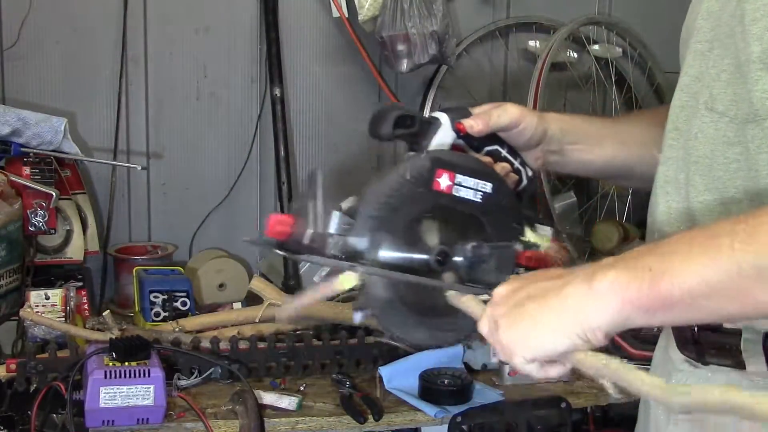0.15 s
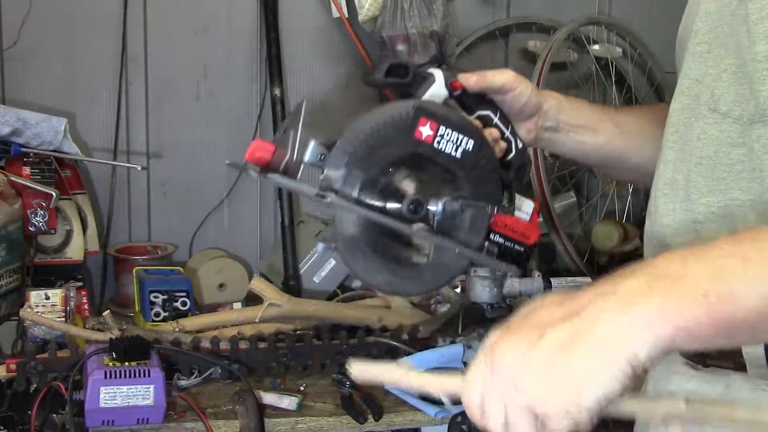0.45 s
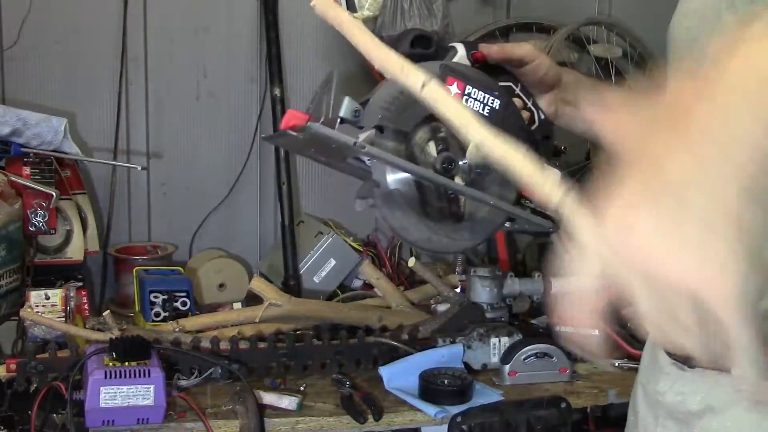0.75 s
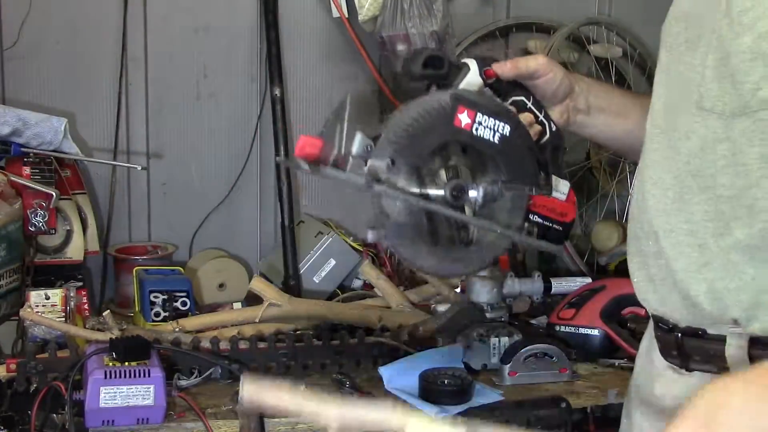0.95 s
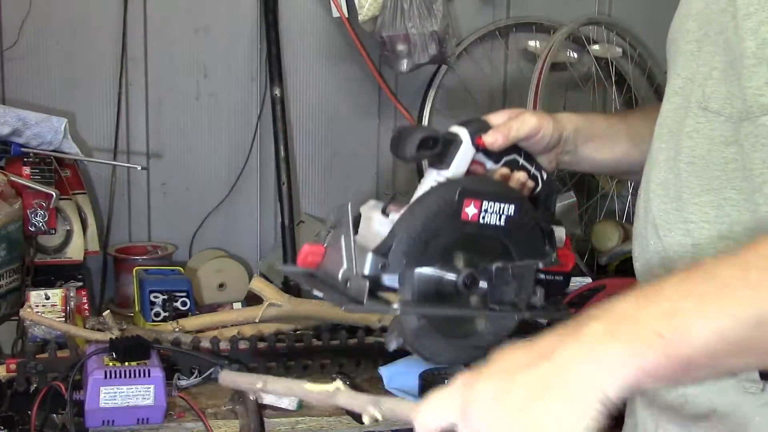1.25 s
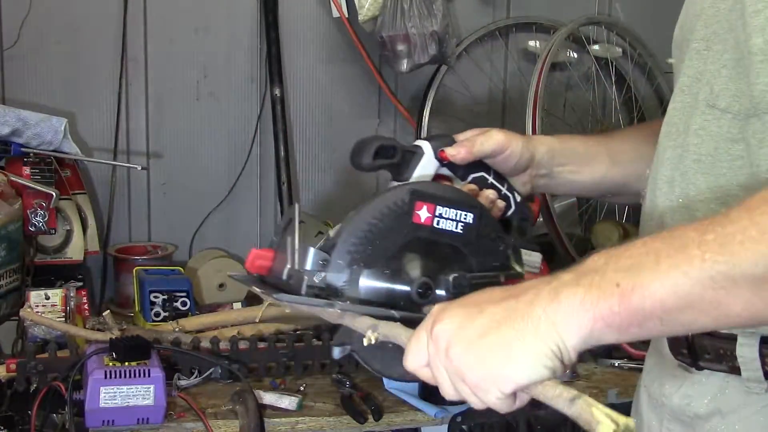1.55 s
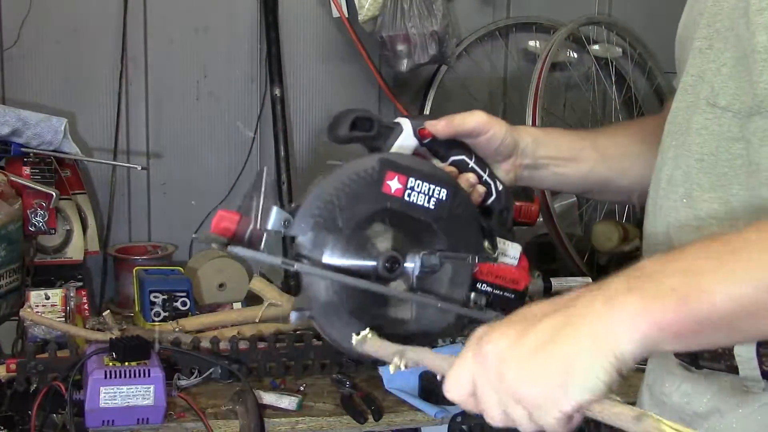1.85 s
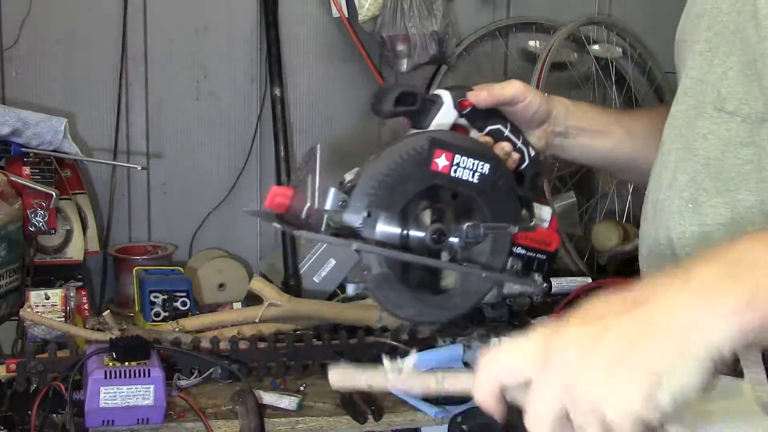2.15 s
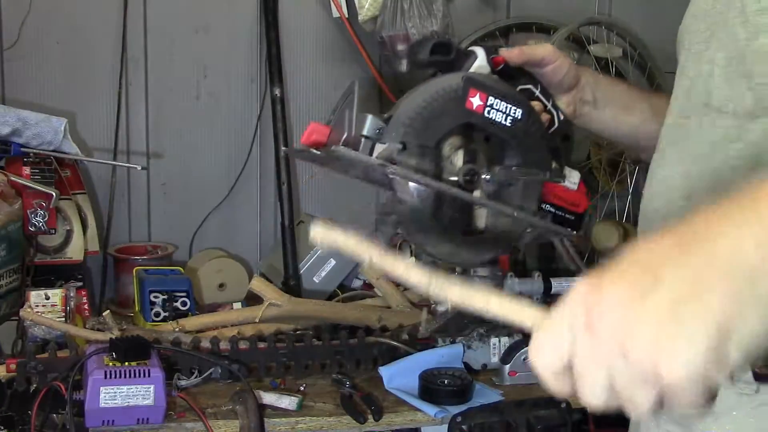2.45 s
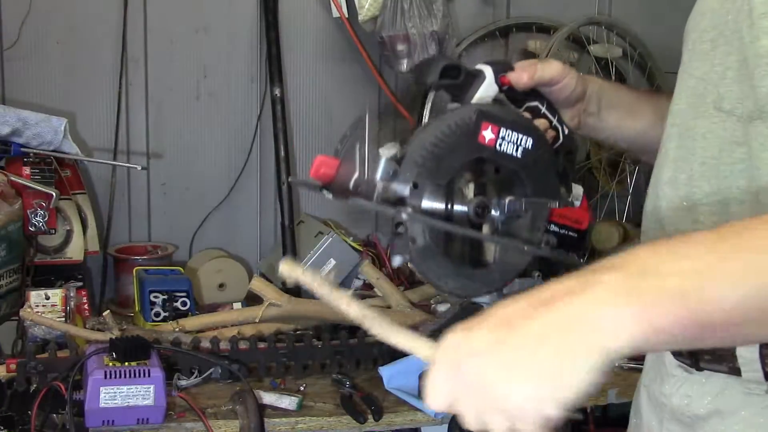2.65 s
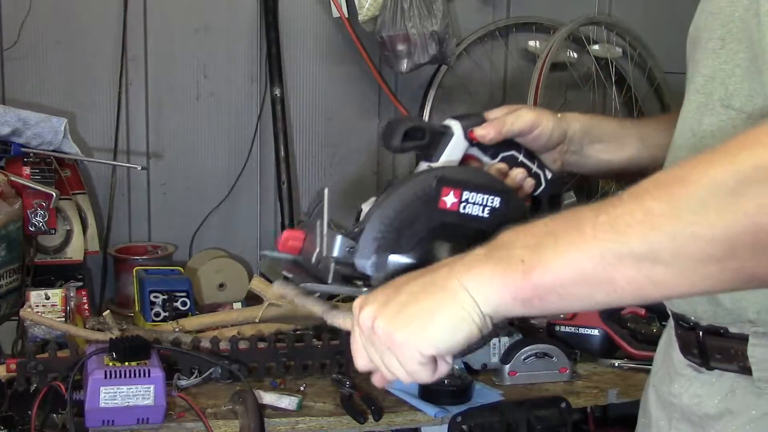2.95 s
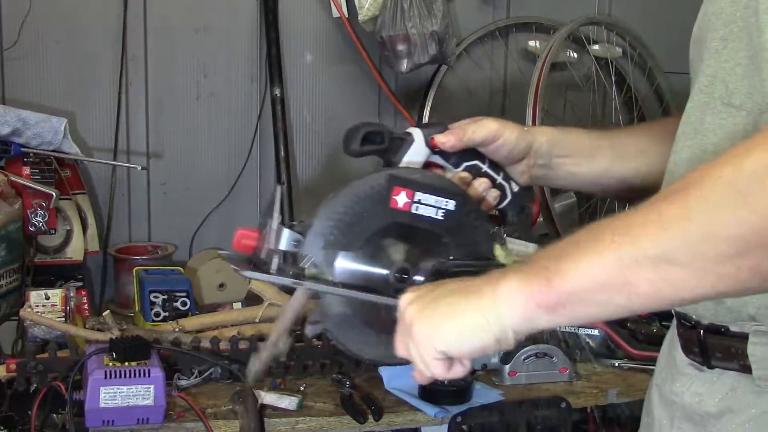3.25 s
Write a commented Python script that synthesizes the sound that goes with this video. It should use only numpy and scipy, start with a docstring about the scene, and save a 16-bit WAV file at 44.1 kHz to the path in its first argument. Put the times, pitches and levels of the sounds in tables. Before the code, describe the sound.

A cordless circular saw makes three quick cuts through sticks, with wood knocking between them.

```python
"""A cordless circular saw trims dry sticks in a small workshop, in three pulls of the trigger.
The gears are already whining as the teeth rip the first stick; the brake stops the still ringing blade
and wood knocks on the bench. The trigger clicks, the motor spins up and a second cut follows at 1.5 s.
The guard snaps shut, the stick taps the metal shoe and wood knocks again; the third cut comes at 3.1 s."""
import sys
import numpy as np
from scipy import signal
from scipy.fft import rfft, irfft, next_fast_len
from scipy.io import wavfile
from scipy.ndimage import map_coordinates

SR = 44100
rng = np.random.default_rng(int(sys.argv[2]) if len(sys.argv) > 2 else 0)


def store_wav(level_fs):
    """Save 16-bit WAV to argv[1]."""
    pcm = np.round(np.clip(np.atleast_2d(level_fs), -1, 1) * 32767)
    wavfile.write(sys.argv[1], SR, pcm.T.astype(np.int16))


N = 149940

# Noise spectra. Each row: frequency in Hz, relative spectral density in dB.
AIR_SPECTRUM = [(15, -76), (25, -72.5), (103, -12.5), (142, -22.5), (176, -9), (286, -20.5), (363, 0.5),
                (450, -8), (1120, -15), (2630, -25.5), (2850, -16.5), (3180, -26.5), (15000, -51)]
WHIRR_SPECTRUM = [(60, -38), (120, -22.5), (230, -13), (450, -11), (800, -5.5), (1400, -7), (2300, -1),
                  (2900, -4), (3900, -3.5), (5700, -18), (7300, 1.5), (8600, -12.5), (10800, -19),
                  (13000, -3), (15500, -31.5)]
RIP_BODY_SPECTRUM = [(30, -46.5), (130, -36.5), (400, -16), (750, -13), (1050, 0), (1500, 1.5), (2000, 1),
                     (2900, 3), (4000, 6.5), (4900, 1), (6000, -1), (9000, -45.5)]
RIP_TREBLE_SPECTRUM = [(2500, -29.5), (4500, -26), (5800, -15.5), (7200, 2), (8700, -1.5), (10500, -5),
                       (12500, -11.5), (15500, -22.5)]
RUMBLE_SPECTRUM = [(20, -16.5), (120, 5.5), (400, -9), (2000, -24.5)]
# Reverberation of the workshop. Each row: frequency in Hz, time to fall 60 dB (t60) in seconds.
ROOM_DECAY = [(150, 0.62), (800, 0.34), (3000, 0.27), (8000, 0.17), (15000, 0.43)]
# Responses of the stereo difference and the saw's housing. Each row: frequency in Hz, gain in dB.
SIDE_RESPONSE = [(50, -11), (250, -31.5), (1000, -35.5), (2000, -35), (4000, -22.5), (12000, -21.5)]
HOUSING_RESPONSE = [(300, -12), (900, 0.5), (1450, 3.5), (2300, 5.5), (2750, 2), (3300, 4), (4100, -1.5),
                    (4700, -6), (5800, 0.5), (6600, -13), (7400, 9.5), (8300, -7), (10000, -7)]
# Bass, middle, presence and treble of a blow. Each row: lower and upper edge in Hz.
BLOW_BANDS = [(150, 550), (550, 2000), (2000, 5000), (5000, 11000)]
# Wood on the bench, the guard shutting, the stick on the shoe, the trigger clicking.
# Each row: start in seconds, then bass, middle, presence and treble levels in dB.
WOOD_HITS = [(.579, -23, -15.5, -38, -49), (.602, -38, -28, -27.5, -44.5), (.655, -47, -32, -48, -55),
             (.69, -48, -38, -53, -62), (.727, -54.5, -38, -56, -63), (.756, -36, -24.5, -30.5, -38),
             (.79, -40, -33, -40, -51), (.893, -47.5, -40, -61, -68), (2.542, -27.5, -16, -19.5, -37.5),
             (2.772, -38, -32.5, -48, -62.5), (2.808, -30.5, -23, -31.5, -53), (2.828, -31, -26, -34, -54)]
GUARD_HITS = [(2.089, -36, -33, -28, -29), (2.108, -33, -29, -22.5, -46.5)]
SHOE_HITS = [(2.29, -53.5, -37.5, -37, -52), (2.386, -46.5, -35, -22.5, -29.5),
             (2.544, -49, -34.5, -28, -40)]
TRIGGER_HITS = [(1.131, -45.5, -38.5, -50.5, -53.5), (2.746, -43.5, -43.5, -46, -51.5)]
# Modes of those four objects. Each row: frequency in Hz, relative level in dB, t60 in seconds.
WOOD_MODES = [(246, 5, 0.11), (371, 3.5, 0.23), (578, -4, 0.11), (779, 3.5, 0.1), (1290, -2.5, 0.027)]
GUARD_MODES = [(200, -7, 0.13), (367, 3, 0.14), (956, -8.5, 0.19), (1620, -10.5, 0.22), (3960, -7, 0.18),
               (4170, 5, 0.09), (4202, 7.5, 0.095), (4200, -5, 0.12), (7030, 7, 0.082), (7170, 2, 0.098)]
SHOE_MODES = [(1096, -1, 0.18), (1650, -10, 0.21), (1845, -1.5, 0.16), (3210, -3, 0.075), (4840, -4, .12),
              (5830, -0.5, .08), (8200, -1.5, 0.14)]
TRIGGER_MODES = [(1500, -21, .2), (3780, -19, .06)]
# Modes of the free blade. Each row: frequency in Hz, relative level in dB.
FREE_BLADE_MODES = [(1335, -63), (1830, -60.5), (2778, -50.5), (2955, -60.5), (4958, -58.5)]
# Blade modes that screech in the kerf. Each row: start and end in seconds, frequency in Hz, level in dB.
SCREECHES = [(.032, .064, 1430, -18), (.085, 0.15, 1435, -18.5), (.015, .12, 1040, -27),
             (3.18, 3.26, 3800, -25), (3.13, 3.17, 2280, -18)]
# Trigger pulls. Each row: motor start in seconds, brake start in seconds, gain in dB.
TRIGGER_PULLS = [(-.35, .278, -0.5), (1.154, 1.813, -1.5), (2.77, 3.365, 1)]
# Gear whine. Each row: multiple of the mesh rate, relative levels in dB under drive and under the brake.
WHINE_HARMONICS = [(1, -33.5, -37), (2, -38, -34), (3, -46, -40.5), (4, -37.5, -42.5)]
# Modes of the gear case and the cutting blade. Each row: frequency and width in Hz, relative level in dB.
CASE_MODES = [(1430, 70, 15), (3850, 300, 9), (7450, 450, -16.5)]
BLADE_LOW_MODES = [(1017, 30, -7.5), (1403.7, 24, 3), (1805, 24, -2.5), (2258, 18, -10), (2280, 12, -2.5),
                   (2616, 6.2, -10), (3270, 5.7, -15), (3528, 4.7, 6.5), (3940, 20, -2.5), (4090, 22, -6.5)]
BLADE_HIGH_MODES = [(5348, 7.9, -16), (6390, 52, -8), (7140, 18, -3), (7580, 16, -12), (7780, 50, -9),
                    (7954, 25, -5), (8720, 14, 5)]
# One envelope for each cut. Each row: time in seconds, body gain in dB, treble gain in dB.
CUT_ENVELOPES = [
    [(0.0, -31, -50.5), (.008, -41, -38), (.013, -17, -9), (.026, -19, -13.5), (.046, -13, -13),
     (.07, -18.5, -12), (.1, -14.5, -11), (.13, -13.5, -12.5), (.15, -22, -24.5), (.18, -34, -45)],
    [(1.492, -37, -43.5), (1.498, -12.5, -9.5), (1.525, -14, -14), (1.585, -21.5, -20), (1.608, -21, -21.5),
     (1.617, -17.5, -11), (1.64, -18.5, -14), (1.655, -25, -18), (1.675, -19.5, -15), (1.696, -18, -18),
     (1.712, -22.5, -30), (1.745, -33, -50.5)],
    [(3.098, -38.5, -43.5), (3.108, -28.5, -26), (3.118, -17.5, -10), (3.136, -11, -8.5),
     (3.172, -15, -12.5), (3.186, -17.5, -15), (3.23, -18, -19.5), (3.25, -22.5, -27), (3.28, -52, -56.5)],
]

GEAR_TEETH, PINION_TEETH, BLADE_TEETH = 46, 9, 24
TOP_MESH_HZ = 2624  # gear mesh rate with no load
TIME = np.arange(N) / SR


def amp(db):
    """Amplitude grows tenfold for every 20 dB."""
    return 10 ** (np.asarray(db) / 20)


def unit(x):
    """Normalisation brings the rms to 1."""
    return x / np.sqrt(np.mean(x ** 2) + 1e-20)


def along(points, hz):
    """Interpolation reads (Hz, value) points on a logarithmic frequency axis."""
    f, v = np.transpose(points)
    return np.interp(np.log(hz + 1), np.log(f + 1), v)


def noise():
    """White noise has equal power in every hertz."""
    return rng.standard_normal(N)


def wobble(rate):
    """A spline through random knots, rate of them a second, fluctuates smoothly."""
    return map_coordinates(rng.standard_normal(int(N * rate / SR) + 4), [TIME * rate])


def filtered(x, response):
    """A linear filter multiplies the spectrum by its frequency response."""
    size = next_fast_len(N + SR // 2)
    return irfft(rfft(x, size) * response(np.fft.rfftfreq(size, 1 / SR)), size)[..., :N]


def coloured(x, spectrum):
    """Spectral shaping colours x; the result has rms 1."""
    return unit(filtered(x, lambda hz: amp(along(spectrum, hz))))


def resonate(x, modes):
    """Damped resonators driven by x add by superposition; the result has rms 1."""
    def response(f):
        return sum(amp(db) * 1j * f * width / (hz ** 2 - f ** 2 + 1j * f * width)
                   for hz, width, db in modes)
    return unit(filtered(x, response))


def workshop_air():
    """Stationary noise forms the quiet background."""
    return amp(-50.5) * coloured(noise(), AIR_SPECTRUM)


def reverberation(x):
    """The room convolves x with a diffuse tail in which each frequency decays at its own rate."""
    hz, t, spectra = signal.stft(rng.standard_normal(SR // 2), SR, nperseg=256)
    tail = signal.istft(spectra * amp(-60 * t / along(ROOM_DECAY, hz)[:, None]), SR, nperseg=256)[1]
    delayed = np.pad(tail / np.linalg.norm(tail), (SR // 300, 0))
    return signal.fftconvolve(x, delayed)[:len(x)]


def impacts(hits, modes, ring_db, low_t60, high_t60, wet_db):
    """An impact gives a burst that dies faster in the treble and excites the object's modes."""
    out, t = np.zeros(N + 2 * SR), np.arange(SR // 2) / SR
    centres = [np.sqrt(lo * hi) for lo, hi in BLOW_BANDS]
    band_t60s = np.geomspace(low_t60, high_t60, len(BLOW_BANDS))
    strongest_db = max(db for _, db, _ in modes)
    for start, *levels in hits:
        blow = 0
        for band, db, t60 in zip(BLOW_BANDS, levels, band_t60s):
            bandpass = signal.butter(4, band, "band", fs=SR, output="sos")
            burst = signal.sosfilt(bandpass, rng.standard_normal(len(t)) * amp(-60 * t / t60))
            blow += amp(db) * burst * np.sqrt(SR / 2 / (band[1] - band[0]))
        for hz, db, t60 in modes:
            excitation_db = along(list(zip(centres, levels)), hz)
            mode_db = excitation_db + ring_db + db - strongest_db + rng.normal(0, 1.6)
            blow += amp(mode_db - 60 * t / t60) * np.sin(2 * np.pi * hz * t) * (1 - np.exp(-t * hz))
        out[round(start * SR):][:len(t)] += blow + amp(wet_db) * reverberation(blow)
    return out[:N]


def free_blade(main_hz=2778, main_t60=2.5, rise_s=.0073):
    """Out of the wood the blade vibrates freely; modes above the main one decay sooner."""
    ends = [cut[-1][0] for cut in CUT_ENVELOPES]
    age = np.min([np.where(TIME > end, TIME - end, TIME[-1]) for end in ends], axis=0)
    ring = 0
    for hz, db in FREE_BLADE_MODES:
        t60 = main_t60 * min(1, main_hz / hz)
        level_db = 7.5 + db + 3 * wobble(14) - 60 * age / t60
        ring += amp(level_db) * np.sqrt(2) * np.sin(2 * np.pi * hz * TIME)
    return (1 - np.exp(-age / rise_s)) * ring


def screeches(waver_hz=32):
    """Friction in the kerf sustains one blade mode, a wavering tone that swells and fades."""
    out = 0
    for start, end, hz, db in SCREECHES:
        progress = np.clip((TIME - start) / (end - start), 0, 1)
        swell = np.sqrt(np.abs(np.sin(np.pi * progress)))
        phase = 2 * np.pi * np.cumsum(hz + waver_hz * wobble(150)) / SR
        out += amp(db + 2 * wobble(120)) * swell * np.sin(phase)
    return out


def mesh_rate(load, spin_up_s=.12, brake_s=.15, friction_hz=750.3, sag=.2, recover_s=.08):
    """Inertia makes the mesh rate, in Hz, lag behind drive, load and brake; friction ends the spin."""
    hz = np.zeros(N)
    for on, off, _ in TRIGGER_PULLS:
        driven_s = np.maximum(np.minimum(TIME, off) - on, 0)
        driven_hz = TOP_MESH_HZ * (1 - np.exp(-driven_s / spin_up_s))
        braking = np.exp(-np.maximum(TIME - off, 0) / brake_s)
        hz += np.maximum((driven_hz + friction_hz) * braking - friction_hz, 0)
    step = 1 / (recover_s * SR)
    lagged_load = signal.lfilter([step], [1, step - 1], load / load.max())
    return hz * (1 - sag * lagged_load)


def gear_whine(mesh_cycles, speed, on, off, runout_rad=.68, flutter_rad=.82):
    """Meshing teeth radiate harmonics, phase-modulated once a motor turn by the pinion's runout."""
    coast_db = -6.5 * np.clip((TIME - on - .28) / .2, 0, 1.5)  # little torque once up to speed
    bite_db = 2.5 - 50 * (TIME - off)  # the brake bites, then its torque falls
    runout = runout_rad * np.sin(2 * np.pi * mesh_cycles / PINION_TEETH)
    whine = 0
    for harmonic, drive_db, brake_db in WHINE_HARMONICS:
        level_db = np.where(TIME < off, drive_db + coast_db, brake_db + bite_db) + 2 * wobble(70)
        rasp = 1 + .5 * wobble(600)
        phase = 2 * np.pi * harmonic * mesh_cycles + runout + flutter_rad * wobble(330)
        whine += amp(level_db) * rasp * np.sin(phase)
    return filtered(whine * speed ** .37, lambda hz: amp(along(HOUSING_RESPONSE, hz)))


def whirr(beat, speed, hiss_hz=6000):
    """Gears and fan radiate broadband noise whose treble depends more steeply on speed."""
    rush = amp(-32.5) * coloured(noise() * beat, WHIRR_SPECTRUM) * speed ** .61
    hiss = filtered(rush, lambda hz: hz ** 4 / (hz ** 4 + hiss_hz ** 4))
    return rush - hiss + hiss * np.tanh(2 * speed)


def motor(mesh_hz, chirp_hz=12430, chirp_width_hz=300):
    """Rotation sets the pitch of the whine and modulates whirr, case noise and a chirp each blade turn."""
    pulls = np.array(TRIGGER_PULLS)
    on, off, pull_db = pulls[np.searchsorted(pulls[:, 0], TIME) - 1].T
    speed, mesh_cycles = mesh_hz / TOP_MESH_HZ, np.cumsum(mesh_hz) / SR
    blade_angle = 2 * np.pi * mesh_cycles / GEAR_TEETH
    whine = gear_whine(mesh_cycles, speed, on, off)
    beat = amp(1.2 * wobble(120)) * (1 + .12 * (np.cos(blade_angle) + np.cos(3 * blade_angle)))
    rush = whirr(beat, speed)
    case = amp(-43.5) * resonate(noise() * beat, CASE_MODES) * np.tanh(4 * speed)
    pulses = noise() * np.exp(2 * np.cos(blade_angle))
    chirp = amp(-39) * resonate(pulses, [(chirp_hz, chirp_width_hz, 0)]) * speed ** 3 * (TIME < off)
    settle = np.where(TIME < off, 1, np.tanh(5.3 * speed))
    return amp(pull_db) * settle * (whine + rush + case + chirp)


def cut_gain(column):
    """An amplitude envelope, linear in dB between points, sets how hard the teeth rip."""
    return sum(amp(np.interp(TIME, cut[:, 0], cut[:, column], left=-np.inf, right=-np.inf))
               for cut in map(np.array, CUT_ENVELOPES))


def cutting(mesh_hz, body, treble, rip_db=-2, pulsed_share=.44, scatter_db=2):
    """Each tooth strikes and tears fibres; the blows drive the blade's modes in forced vibration."""
    teeth = np.cumsum(np.where(body > 0, mesh_hz, TOP_MESH_HZ)) / SR * BLADE_TEETH / GEAR_TEETH
    tooth_strength = amp(scatter_db * noise()[teeth.astype(int)])
    bite = unit(tooth_strength * np.exp(-4 * (teeth % 1)))
    grip = np.sqrt(1 - pulsed_share + pulsed_share * bite ** 2)
    low = amp(rip_db) * coloured(grip * noise(), RIP_BODY_SPECTRUM)
    low += amp(-5.5) * resonate(grip * noise(), BLADE_LOW_MODES)
    high = amp(rip_db) * coloured(grip * noise(), RIP_TREBLE_SPECTRUM)
    high += amp(-5) * resonate(grip * noise(), BLADE_HIGH_MODES)
    return body * low + treble * high


def scene():
    """The sources add by superposition; only faint reverberation sets the two channels apart."""
    body, treble = cut_gain(column=1), cut_gain(column=2)
    mesh_hz = mesh_rate(load=body + treble)
    saw = motor(mesh_hz) + cutting(mesh_hz, body, treble)
    mid = saw + amp(-7.5) * reverberation(saw) + screeches() + free_blade()
    mid += impacts(WOOD_HITS, WOOD_MODES, ring_db=-5.5, low_t60=.14, high_t60=.05, wet_db=-7)
    mid += impacts(GUARD_HITS, GUARD_MODES, ring_db=6, low_t60=.099, high_t60=.025, wet_db=-4.5)
    mid += impacts(SHOE_HITS, SHOE_MODES, ring_db=-3.5, low_t60=.078, high_t60=.038, wet_db=-2)
    mid += impacts(TRIGGER_HITS, TRIGGER_MODES, ring_db=4, low_t60=.12, high_t60=.098, wet_db=-.5)
    mid += workshop_air()
    side = filtered(reverberation(mid), lambda hz: amp(along(SIDE_RESPONSE, hz)))
    return np.array([mid + side, mid - side])


def record(dry, ceiling=.82, low_hz=60.3, high_hz=15950):
    """Soft saturation rounds the highest peaks; filters thin the deep bass and limit the band."""
    rounded = dry / (1 + np.abs(dry / ceiling) ** 6) ** (1 / 6)
    thin = signal.sosfilt(signal.butter(2, low_hz, "high", fs=SR, output="sos"), rounded)
    rumble = amp(-78) * coloured(rng.standard_normal((2, N)), RUMBLE_SPECTRUM)
    return filtered(thin + rumble, lambda hz: np.clip((high_hz - hz) / 150, 0, 1))


dry = scene()
out = record(dry)
store_wav(out)
```